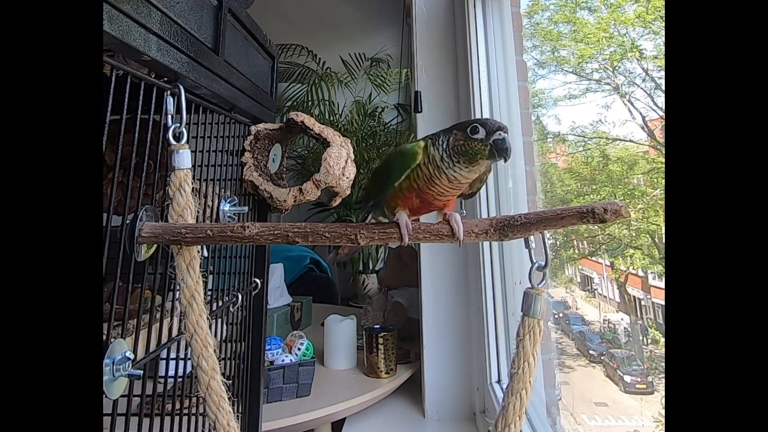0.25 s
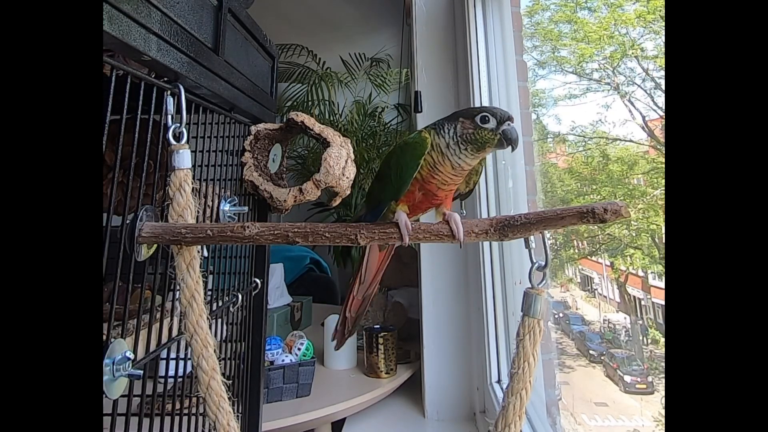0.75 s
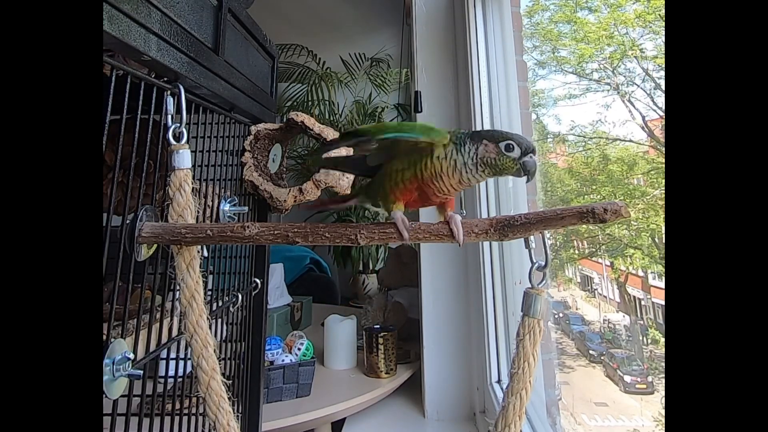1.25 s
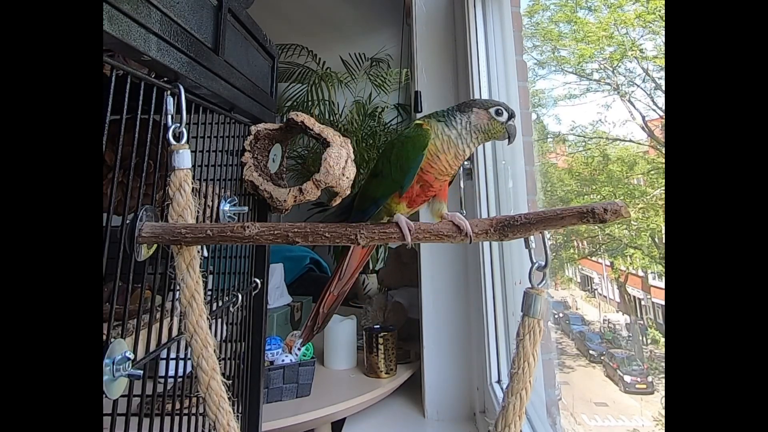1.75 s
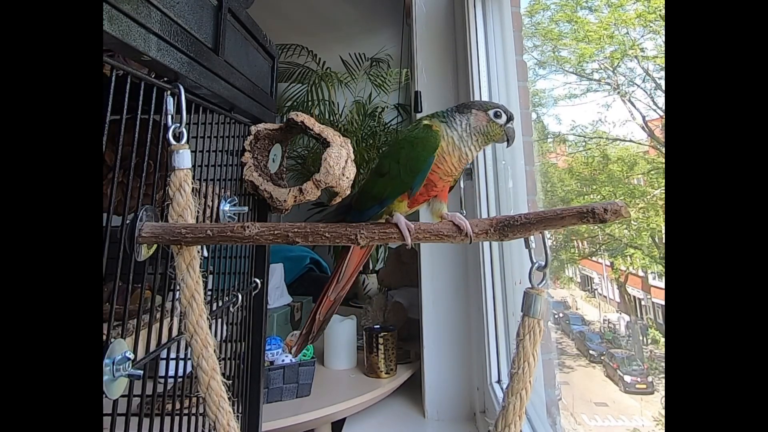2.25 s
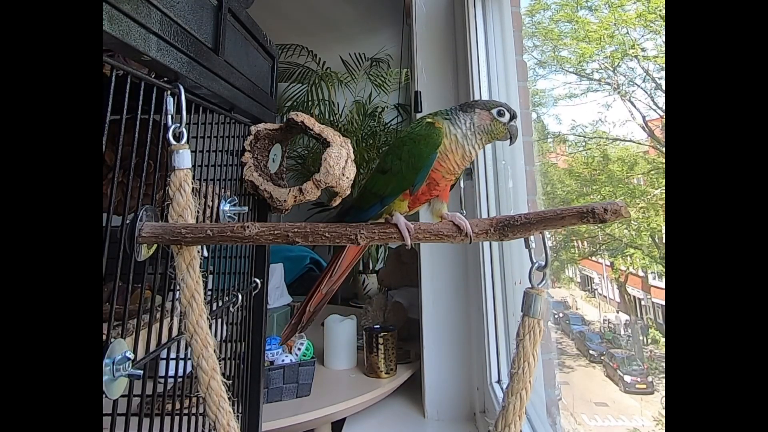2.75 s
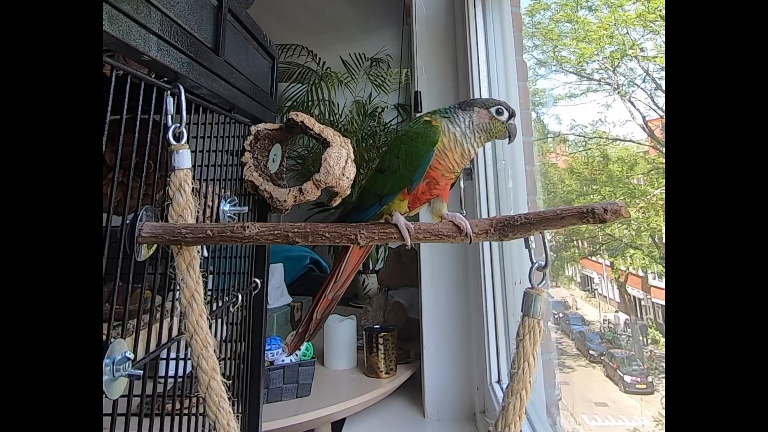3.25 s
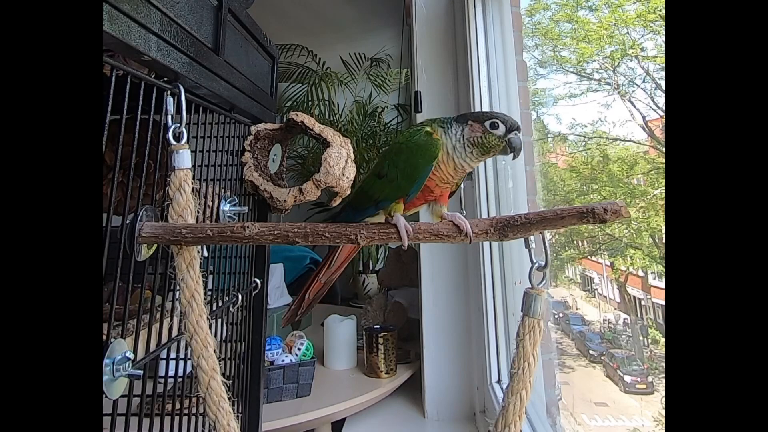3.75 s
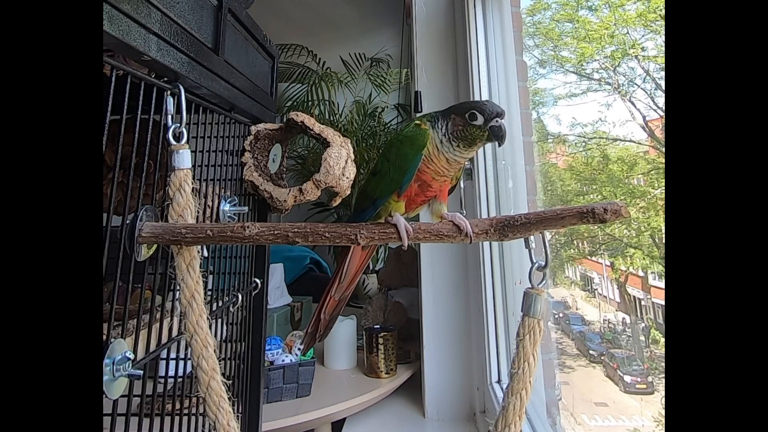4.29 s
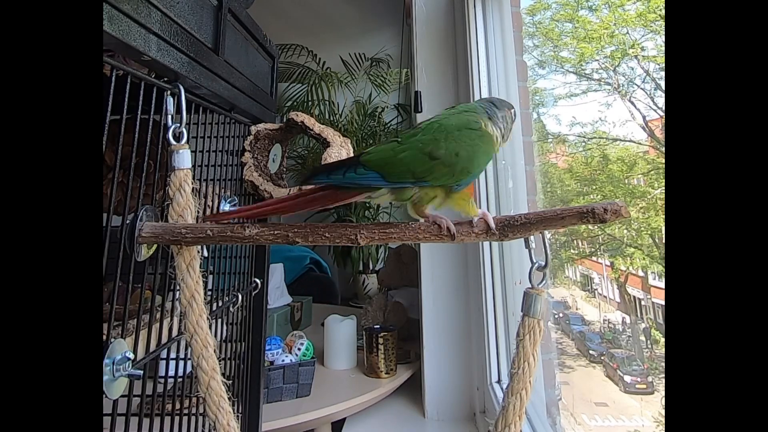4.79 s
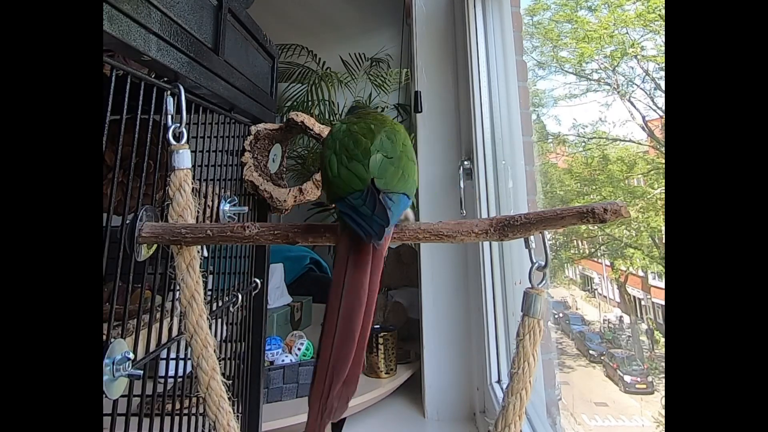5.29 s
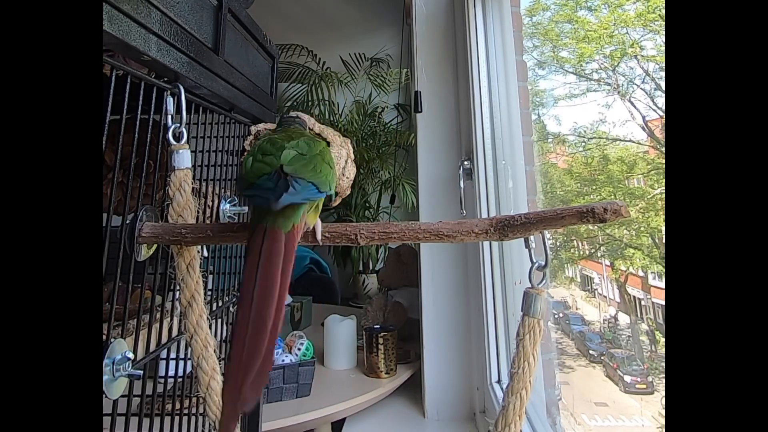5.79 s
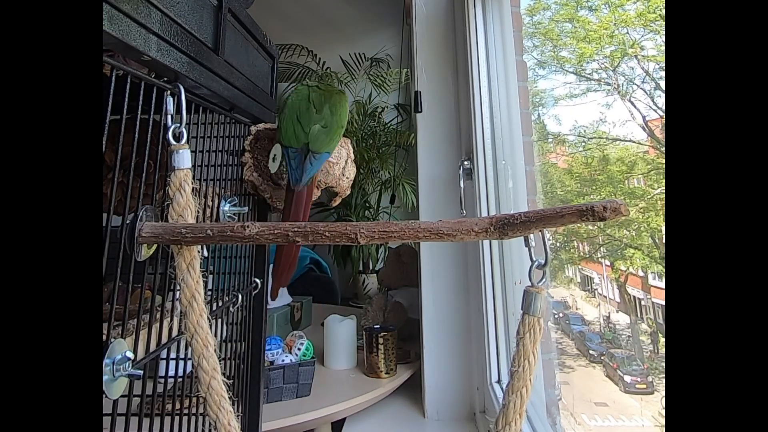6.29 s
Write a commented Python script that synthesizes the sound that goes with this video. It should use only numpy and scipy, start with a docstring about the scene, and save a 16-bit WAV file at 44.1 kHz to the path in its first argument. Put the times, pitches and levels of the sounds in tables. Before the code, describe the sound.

Five short, raspy, ear-splitting parrot screeches echo in a bare room over faint traffic hum, followed by soft perch thumps and claw taps.

```python
"""In a bare, ringing room, a small parrot on a perch by a window shrieks five times, close by.
Slaps of its membranes creak, then whistled glides drop and break into noisy bursts that ring the throat.
Damped rings make the beak and claw clicks; shaped noise makes the feathers, the shaken perch,
the low hum of far traffic and the air. Decaying noise makes the echo, and a fast limiter holds the peaks."""
import sys
import numpy as np
from scipy import signal
from scipy.fft import rfft, irfft, next_fast_len
from scipy.io import wavfile
from scipy.ndimage import uniform_filter1d, minimum_filter1d, map_coordinates

SR = 44100
rng = np.random.default_rng(int(sys.argv[2]) if len(sys.argv) > 2 else 0)


def transcribe(signal):
    """Save signal, clipped to [-1, 1], as a 16-bit WAV file at the path in sys.argv[1]."""
    frames = np.atleast_2d(signal).T
    limited = np.clip(frames, -1, 1)
    pcm = np.round(limited * 32767).astype(np.int16)
    wavfile.write(sys.argv[1], SR, pcm)


N = 287973
T = np.arange(N) / SR


def amp(db):
    """Decibels to an amplitude factor."""
    return 10 ** (np.asarray(db) / 20)


def unit(x):
    """x scaled to an rms of 1."""
    return x / np.sqrt(np.mean(np.abs(x) ** 2) + 1e-20)


def along(points, hz):
    """Reads a curve of (frequency_hz, value) points on a log frequency axis."""
    f, v = np.transpose(points)
    return np.interp(np.log(hz + 1), np.log(f + 1), v)


def wobble(rate):
    """A smooth random curve, rate knots a second."""
    knots = rng.standard_normal(int(N * rate / SR) + 4)
    return map_coordinates(knots, [T * rate])


def filtered(x, response):
    """x times a complex response of frequency."""
    m = next_fast_len(N + SR // 2)
    hz = np.fft.rfftfreq(m, 1 / SR)
    return irfft(rfft(x, m) * response(hz), m)[..., :N]


def band(low_hz, high_hz):
    """A causal response that is steep below low_hz and above high_hz."""
    def response(hz):
        high_pass = (1j * hz / low_hz / (1 + 1j * hz / low_hz)) ** 3
        return high_pass / (1 - (hz / high_hz) ** 2 + 1.2j * hz / high_hz) ** 3
    return response


def rush(spectrum, alike):
    """Stereo noise of rms 1: sharing between mid and side sets how alike left and right are."""
    def mid_and_side(hz):
        turn = np.arccos(np.clip(along(alike, hz), -1, 1)) / 2
        return amp(along(spectrum, hz)) * [np.cos(turn), np.sin(turn)]
    mid, side = filtered(rng.standard_normal((2, N)), mid_and_side)
    return unit(np.array([mid + side, mid - side]))


def resonance(centre_hz, width_hz):
    """Two strands of tone that wander about a moving centre, each swelling and fading by itself."""
    def strand():
        swell = 1 + .6 * np.tanh(wobble(500))
        pitch_hz = np.zeros(N) + centre_hz + .6 * width_hz * np.tanh(.8 * wobble(700))
        return swell * np.sin(2 * np.pi * np.cumsum(pitch_hz) / SR)
    return unit(strand() + strand())


# tone colour of the breath in the rasp: frequency_hz, relative density_db (per Hz)
BREATH_SPECTRUM = [(240, -81), (400, -45), (929, -43), (1400, -26), (2420, -14.5), (2670, -13), (2980, -8),
                   (3250, -15.5), (3740, -6.5), (4880, -20.5), (6280, -14), (6840, -13.5), (9720, -20.5),
                   (11500, -50.5), (15000, -79), (22000, -120)]


def voice():
    """The membranes flap chaotically: uneven bursts of air ring the throat and break up the whistle."""
    gate, level_db, low_hz, high_db, high_hz, width_hz = rasp()
    bursts = unit(1 + .4 * np.tanh(1.3 * wobble(240)))
    drive = gate * amp(level_db) * bursts

    low = resonance(.88 * low_hz, width_hz=1150)
    high = resonance(high_hz, width_hz)
    high = high + amp(-16) * resonance(1.41 * high_hz, width_hz=800)
    throat = amp(-7.5) * low + amp(high_db - 1.5) * high
    rings = drive * throat + np.sqrt(bursts) * whistles()

    air = unit(filtered(rng.standard_normal(N), lambda hz: amp(along(BREATH_SPECTRUM, hz))))
    bright = filtered(air, lambda hz: 1 / (1 + (5000 / (hz + 1)) ** 6))
    # the breath above about 5 kHz brightens along with the upper resonance
    breath = amp(-6) * (air - bright + amp(high_db + 4.0) * bright)
    top_ring = amp(-42.5) * resonance(14100, width_hz=1100)  # a thin ring far above the rest, near four times the whistle's pitch

    def windpipe(hz):
        # it swallows the band between the two main resonances
        return band(low_hz=800, high_hz=10500)(hz) * (1 - 0.38 * np.exp(-((hz - 5000) / 450) ** 2))
    return filtered(rings, windpipe) + drive * (breath + top_ring)


# base settings of each shriek, shaped further by the curves below:
# start_s, length_s, level_db, drop_after_s, held_note_after_s, upper_resonance_hz, upper_width_hz,
# upper_level_db (over the usual), lower_resonance_at_drop_hz
SHRIEKS = [(0.265, .196, -18, .025, .056, 6340, 516.5, 1.5, 3458),
           (0.842, .199, -18.5, .029, .064, 6322, 603, 1.5, 2909),
           (2.262, .195, -15, .03, .063, 6724, 949, -3, 3098),
           (3.582, .178, -18.5, .024, .1, 6813, 1153, 1.5, 2590),
           (4.656, .189, -16, .033, .068, 6933, 1206, -2, 3026)]
# curves through a shriek, columns: at the start, in the opening, at the drop, in the held note,
# before the end, at the end
EFFORT_DB = [-7.5, -6, 0.5, -3.5, -9.5, -12.5]  # added to the shriek's level
BRIGHT_DB = [-9, -8, -9.5, -2.5, 3, -5]  # added to the level of the upper resonance
UPPER_BENDS = [1.04, 1.02, .98, .99, 1.02, 1.05]  # factor on the upper resonance
OPENING_S, DIP_S, LAST_S = .02, .016, .012  # lengths of the opening, the drop and the last moment


def rasp():
    """Throat controls: a shriek peaks at its drop, then weakens and brightens; the low ring follows the tune."""
    rows = []
    for shriek, tune in zip(SHRIEKS, TUNES):
        start, length, db, drop, held, high_hz, width_hz, high_db, dip_hz = shriek
        open_from, open_to, _, _, _, held_from, held_to, *_ = tune
        times = start + np.array([0, OPENING_S / 2, drop + DIP_S / 2, held + OPENING_S,
                                  length - LAST_S, length])
        held_middle = (held_from + held_to) / 2
        low_hz = [open_from, (open_from + open_to) / 2, dip_hz, held_from, held_middle, held_middle]
        rows += zip(times, db + np.array(EFFORT_DB), low_hz, high_db + np.array(BRIGHT_DB),
                    high_hz * np.array(UPPER_BENDS), width_hz * np.ones_like(times))
    times, *controls = np.transpose(rows)
    gate = sum((T >= row[0]) & (T < row[0] + row[1]) for row in SHRIEKS)
    return uniform_filter1d(gate * 1., size=133), *[np.interp(T, times, c) for c in controls]


# whistle of each shriek, before it wavers: opening_from_hz, opening_to_hz, drop_hz, climb_from_hz,
# climb_to_hz, held_from_hz, held_to_hz, opening_db, drop_db, climb_db, held_db, roughness (0-1)
TUNES = [(3724, 3400, 2300, 2100, 2650, 3520, 3950, -18.5, -18.5, -19.5, -16, .25),
         (3723, 3957, 2420, 2490, 3190, 3730, 3800, -19.5, -19.5, -17, -16.5, 0.2),
         (3581, 3640, 2780, 2950, 3600, 3400, 4150, -17.5, -19.5, -18, -18.5, .45),
         (3070, 4010, 2380, 3000, 3930, 3950, 4150, -20, -12, -22.5, -20.5, .5),
         (3375, 3480, 2300, 2780, 3500, 3550, 4300, -17.5, -15.5, -17, -17.5, .55)]
# one column each for opening, drop, climb, held note
OCTAVE_DB = [-7, -14, -18, -25.5]  # level of the octave over the whistle
WAVER = [.5, .9, 1.1, .95]  # factor on the roughness
BEND = .85  # glides move fastest at first
HELD_FADES_DB = -8


def whistles():
    """For moments the membranes lock into one gliding tone with its octave, stage after stage."""
    out, drift, swell = np.zeros(N), wobble(350), wobble(220)
    for (at, total, _, drop, held, *_), tune in zip(SHRIEKS, TUNES):
        (open_from, open_to, drop_hz, climb_from, climb_to, held_from, held_to,
         open_db, drop_db, climb_db, held_db, rough) = tune
        stages = [(0, OPENING_S, open_from, open_to, open_db, 0),
                  (drop, drop + DIP_S, drop_hz, drop_hz, drop_db, 0),
                  (drop + DIP_S, held + LAST_S / 2, climb_from, climb_to, climb_db, 0),
                  (held, total, held_from, held_to, held_db, HELD_FADES_DB)]
        for stage, octave_db, waver in zip(stages, OCTAVE_DB, rough * np.array(WAVER)):
            start, end, from_hz, to_hz, db, fade_db = stage
            span = slice(round((at + start) * SR), round((at + end) * SR))
            u = (T[span] - at - start) / (end - start)  # progress, 0 to 1
            glide_hz = from_hz + (to_hz - from_hz) * np.abs(u) ** BEND
            pitch_hz = glide_hz * (1 + (.004 + .09 * waver) * drift[span])
            phase = 2 * np.pi * np.cumsum(pitch_hz) / SR
            edge = np.minimum(u, 1 - u) * (end - start) / .004  # 4 ms fades
            shape = np.clip(edge, 0, 1) * amp(db + fade_db * u + 6 * waver * swell[span])
            out[span] += shape * (np.sin(phase) + amp(octave_db) * np.sin(2 * phase))
    return out


def tick(db, modes, t60, grit):
    """A short crack: damped rings at (pitch_hz, level_db) and some grit, gone 60 dB after t60 s."""
    t = T[:SR // 20]
    rings = sum(amp(level) * np.sin(2 * np.pi * hz * t) for hz, level in modes)
    envelope = amp(db - 60 * t / t60) * (1 - np.exp(-t * 25 / t60))
    return envelope * (rings + grit * rng.standard_normal(len(t)))


# creaks that open a shriek: start_s, level_db (relative), pitch_hz
CREAKS = [(0.2464, -31, 2270), (0.2546, -29, 3900), (0.2604, -17.5, 3590), (0.828, -26.5, 2390),
          (0.833, -19.5, 3780), (2.2392, -30.5, 1340), (2.2453, -27, 1950), (2.2513, -26, 3630),
          (3.5623, -38, 1530), (3.5708, -28.5, 2316), (3.5766, -19.5, 1900), (3.5846, -18, 2930),
          (4.6356, -33, 1680), (4.6421, -15.5, 3040), (4.6517, -29.5, 3490)]


def creaks():
    """Single slaps of the membranes before the voice sets in, each a ring with its octave."""
    out = np.zeros(N + SR)
    for s, db, hz in CREAKS:
        modes = [(hz, 0), (2 * hz, -6), (6500, -9)]
        out[round(s * SR):][:SR // 20] += tick(db, modes, t60=.013, grit=.55)
    return filtered(out[:N], band(low_hz=644, high_hz=7900))


# beak clicks: start_s, level_db (relative), upper_resonance_hz
BEAK = [(0.2143, -39, 8030), (3.277, -39.5, 8190), (3.3551, -38, 6950), (4.444, -39, 8100),
        (5.291, -41, 6990)]
# lower resonances of a beak click: pitch_hz, level_db (over the upper resonance)
MOUTH = [(4540, -11.5), (3450, -15), (1340, -13)]
# claws and bill on perch and cage: start_s, level_db (relative), pitch_hz
CLAWS = [(1.4073, -56.5, 3600), (1.8089, -58, 1620), (2.8311, -57, 4600), (5.447, -58, 2800),
         (5.5369, -60, 3160), (5.59, -60.5, 5820), (5.7263, -56.5, 3140), (5.7788, -59.5, 4920),
         (5.9957, -45.5, 2350), (6.051, -43.5, 2130), (6.068, -35, 1605), (6.151, -52.5, 1780),
         (6.2534, -46.5, 1660), (6.2929, -38, 1550), (6.3867, -42, 3100), (6.412, -46, 1450),
         (6.4846, -54, 3270)]
CLAW_ROOM_DB, BEAK_ROOM_DB = -0.5, 16.5  # send into the room
WOODY_DB = 5  # each octave lower, a claw click fills the room this much more
FAINT_DB, FAINT_HZ = -66, 3030  # lowest level and middle pitch of the faint scratches
CLIMB_S = 4.6, 7.4  # faint scratches while it climbs to the cage; any past the end go unheard


def clicks():
    """Hard little contacts ring briefly, returned straight and as sent into the room."""
    near, far = np.zeros((2, N + SR))
    faint = [(np.interp(u, [0, 1], CLIMB_S), FAINT_DB + 12 * v, FAINT_HZ * 3 ** (w - .5))
             for u, v, w in rng.random(size=(16, 3))]
    beak = [(s, BEAK_ROOM_DB, tick(db, [(hz, 0)] + MOUTH, t60=.0035, grit=.25))
            for s, db, hz in BEAK]
    claws = [(s, CLAW_ROOM_DB - WOODY_DB * np.log2(hz / FAINT_HZ),
              tick(db, [(hz, 0)], t60=.013, grit=1.05)) for s, db, hz in CLAWS + faint]
    for s, room_db, snap in beak + claws:
        near[round(s * SR):][:SR // 20] += snap
        far[round(s * SR):][:SR // 20] += amp(room_db) * snap
    both = np.array([near[:N], far[:N]])
    return filtered(both, band(low_hz=500, high_hz=np.array([[9500], [7800]])))


# how long the room rings: frequency_hz, t60_s
ROOM = [(500, 0.95), (2000, 0.42), (4000, 0.52), (6500, 0.41), (10000, 0.38)]


def room(x, alike):
    """Echo: each frequency of a noise tail dies at its own speed; each stretch meets other reflections."""
    out = np.zeros((2, N + 2 * SR))
    edges = np.round(np.array([0, .7, 2.1, 3.45, 4.55, 5.2, N / SR]) * SR).astype(int)
    for a, b in zip(edges, edges[1:]):
        hz, t, z = signal.stft(rng.standard_normal((3, SR)), SR, nperseg=256)
        decay = amp(-60 * t / along(ROOM, hz)[:, None])
        both, left, right = signal.istft(z * decay, SR, nperseg=256)[1][:, :SR]
        shared = np.sqrt(np.clip(alike, 0, 1)) * both
        tail = shared + np.sqrt(np.clip(1 - alike, 0, 1)) * np.array([left, right])
        echo = signal.fftconvolve(x[None, a:b], tail / np.linalg.norm(both), axes=1)
        out[:, a + 130:][:, :b - a + SR - 1] += echo  # 130 samples: about 3 ms late
    return out[:, :N]


# the bird shifts, flaps, turns and climbs: peak_s, rise_s and fall_s (each per 20 dB),
# perch_rumble_db, perch_boom_db, dull_flap_db, fine_rustle_db
MOVES = [(1.06, .02, 0.31, -92, -59.5, -62, -50.5), (1.18, 0.034, .35, -85, -52.5, -60.5, -59),
         (1.458, 0.12, 0.13, -90, -60.5, -62.5, -74), (1.82, 0.12, 0.41, -73, -68.5, -74, -73),
         (2.03, .08, .1, -73.5, -76, -72, -85), (2.842, .05, 0.18, -86, -77.5, -62.5, -67),
         (3.361, .1, 0.17, -73, -64, -73, -85), (3.54, 0.22, 0.24, -72, -59, -78, -80),
         (5.07, .12, 0.21, -54.5, -54, -65, -64), (5.3, 0.17, 0.24, -86, -53.5, -64.5, -69.5),
         (5.56, .2, 0.35, -85, -64.5, -78, -74.5), (5.8, 0.23, .2, -76, -58, -69, -80.5),
         (5.93, .15, .15, -60.5, -58.5, -68, -64.5), (5.996, 0.019, 0.056, -57, -51, -60, -51.5),
         (6.052, .03, 0.21, -57, -60.5, -56, -56.5), (6.16, .1, .15, -62, -55, -61, -76),
         (6.324, 0.18, 0.32, -83, -58, -64.5, -65), (6.5, 0.17, .2, -80, -55.5, -69, -63)]
PERCH_QUICK = 1.5  # the rumble comes and goes this much faster than the rustle
SHAKE_DB = -77, -62  # columns: rumble_db, boom_db while the bird shrieks


def movement():
    """Power of perch rumble, perch boom, flap and rustle: each move swells and dies, shrieks shake the perch."""
    quick = np.c_[[PERCH_QUICK, 1, 1, 1]]
    power = np.zeros((4, N))
    for s, rise, fall, *levels in MOVES:
        distance = np.maximum((s - T) / rise, (T - s) / fall)
        power += amp(np.c_[levels] - 20 * quick * distance) ** 2
    shriek = uniform_filter1d(rasp()[0], size=3000)
    power[:2] += np.outer(amp(SHAKE_DB), shriek) ** 2
    return power


# stereo likeness of the noise beds: frequency_hz, left_right_likeness (-1 to 1)
ALIKE = [(60, .93), (150, .8), (300, .7), (640, -.1), (1500, 0), (3000, .3), (8000, .1)]
# tone colours of the dull flap and the fine rustle: frequency_hz, relative density_db (per Hz)
FLAP = [(180, -43), (300, -6.5), (589, -4.5), (911, -10.5), (1300, -10.5), (1690, -38.5), (2860, -120)]
FEATHERS = [(760, -38), (1300, -22.5), (1610, 1), (2320, 6.5), (5830, -3), (9620, -6), (11000, -26.5),
            (14300, -49), (22000, -120)]


def feathers(flap, rustle):
    """Feathers rub: a dull and a fine noise share one fast, uneven grain."""
    grain = amp(3 * wobble(60))
    return flap * unit(grain * rush(FLAP, ALIKE)) + rustle * unit(grain * rush(FEATHERS, ALIKE))


# tone colours of rumble, hum and air: frequency_hz, relative density_db (per Hz)
RUMBLE = [(12, -48.5), (20, -8), (54, 4), (86, -7), (110, -11), (140, -40.5), (240, -120)]
HUM = [(59, -71.5), (100, -32), (113, -24.5), (129, -8.5), (150, 2.5), (247, 1), (275, -11), (380, -11.5),
       (490, -40.5), (840, -120)]
AIR = [(180, -34.5), (300, -7), (499, -5), (583, -9), (746, -3), (1100, -16.5), (1300, -8), (2130, -18.5),
       (9970, -34.5), (12000, -38), (15600, -69), (22000, -120)]
RUMBLE_DB, HUM_DB, AIR_DB = -85, -67, -70.5  # at rest; rumble and hum drift about these


def background():
    """Far traffic hums through the glass over steady air; the perch and feathers stir with the bird."""
    power = movement()
    power[:2] += amp([RUMBLE_DB + 5 * wobble(5.4), HUM_DB + 1.8 * wobble(6)]) ** 2
    rumble, hum, flap, rustle = np.sqrt(power)
    low = rumble * rush(RUMBLE, ALIKE) + hum * rush(HUM, ALIKE)
    return low + amp(AIR_DB) * rush(AIR, ALIKE) + feathers(flap, rustle)


# stereo lean of the near bird: frequency_hz, left_minus_right_db
LEAN = [(60, -2.5), (150, -2.5), (380, 0.5), (950, -7.5), (2380, 3), (5980, -5), (15000, -1.5)]


def scene():
    """The near bird and its clicks, their echoes and the background, summed in stereo."""
    bird = voice() + creaks()
    near, far = clicks()
    echo = amp(-5) * room(bird, alike=0.17)
    # the echo of an earlier shriek, one like the fourth, is still dying at the start
    echo[:, :SR // 4] += amp(4.5) * echo[:, round(4.05 * SR):][:, :SR // 4]

    def ears(hz):
        # the bird sits to the right: its sound reaches the left 25 microseconds later
        lag = np.exp(-1j * np.pi * hz * 2.5e-5 * np.array([[1], [-1]]))
        return amp(along(LEAN, hz) * [[.5], [-.5]]) * lag
    direct = filtered(amp(-1.0) * bird + near, ears)
    return direct + echo + room(far, alike=0.27) + background()


LIMIT, HOLD_S = .39, .003  # limiter: ceiling (of full scale), window
TOP_HZ = 15640  # band limit


def record(dry):
    """A fast limiter shaves the peaks, then everything above the band limit is cut."""
    size = int(HOLD_S * SR)
    need = np.minimum(1, LIMIT / (np.abs(dry).max(axis=0) + 1e-9))
    gain = uniform_filter1d(minimum_filter1d(need, size=size), size=size)
    return filtered(dry * gain, lambda hz: hz < TOP_HZ)


dry = scene()
out = record(dry)
transcribe(out)
```